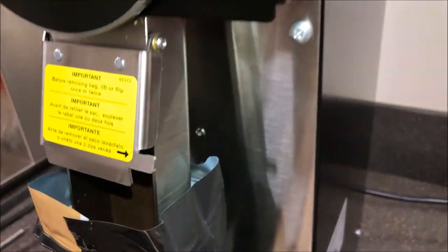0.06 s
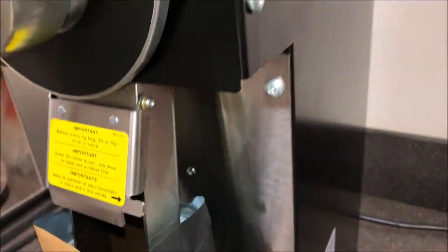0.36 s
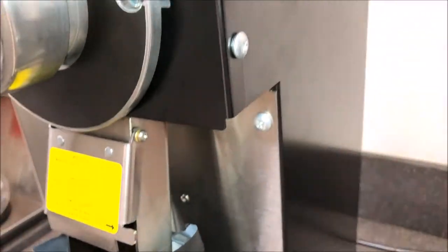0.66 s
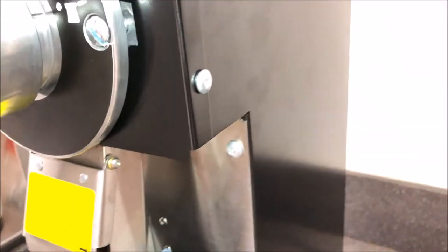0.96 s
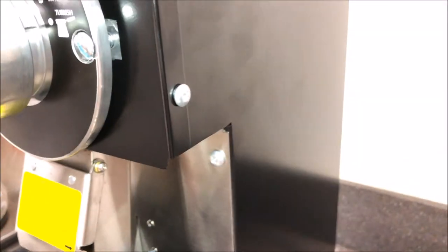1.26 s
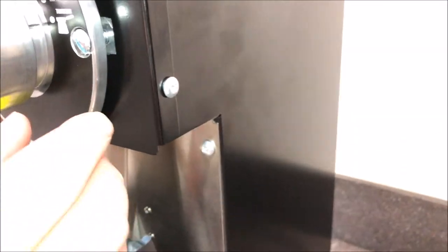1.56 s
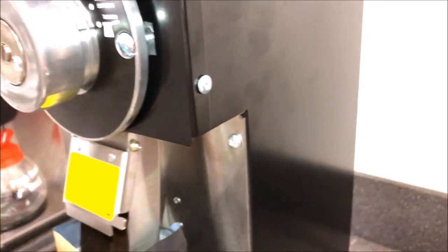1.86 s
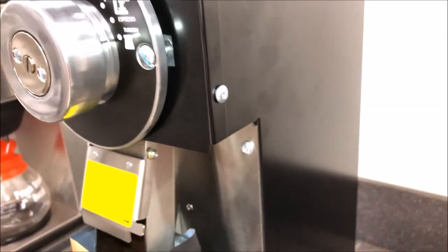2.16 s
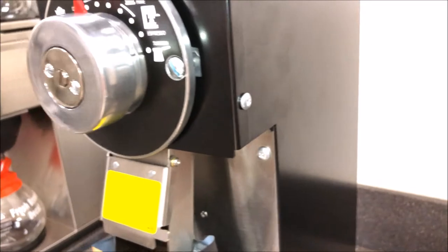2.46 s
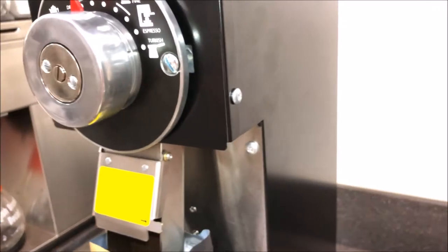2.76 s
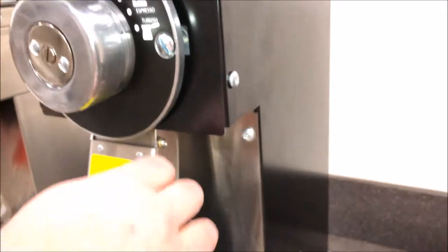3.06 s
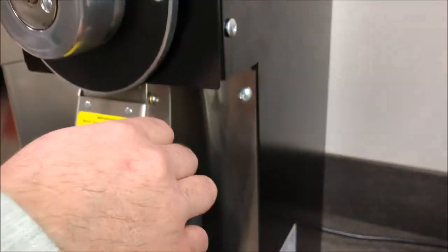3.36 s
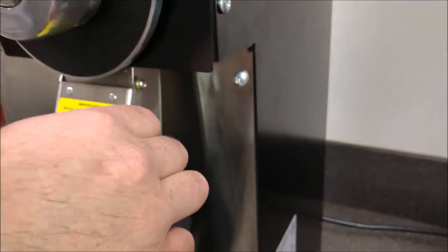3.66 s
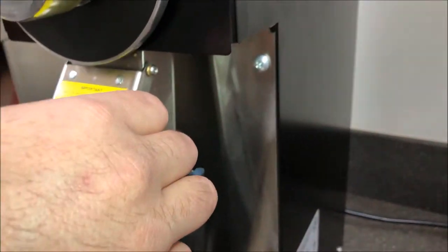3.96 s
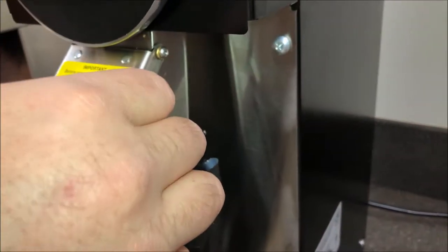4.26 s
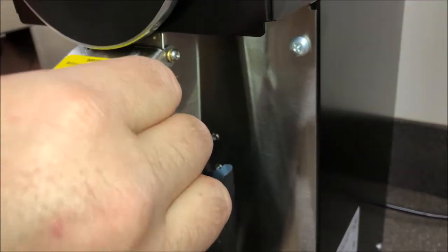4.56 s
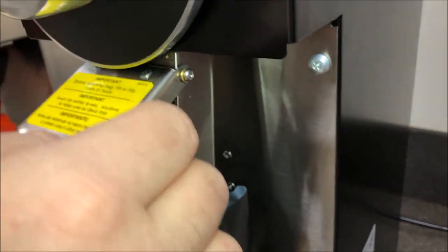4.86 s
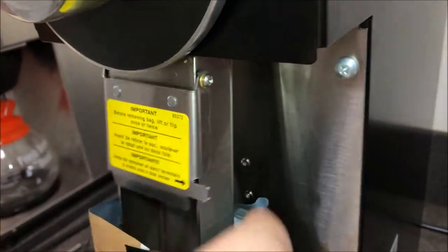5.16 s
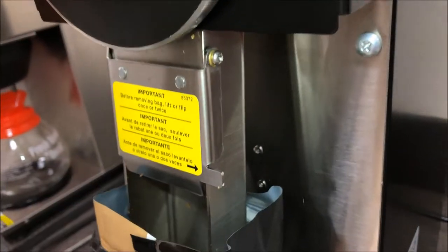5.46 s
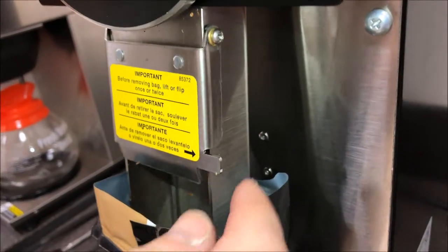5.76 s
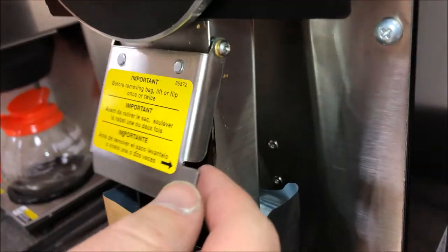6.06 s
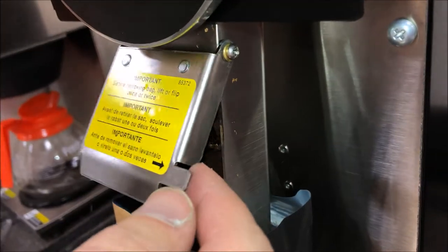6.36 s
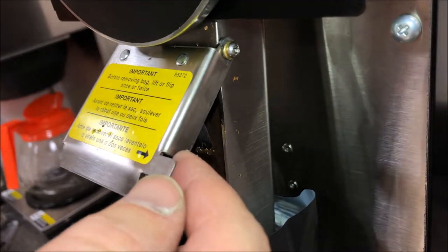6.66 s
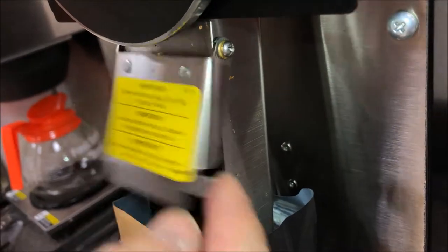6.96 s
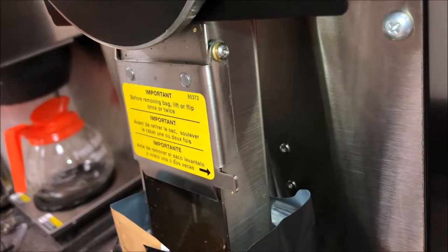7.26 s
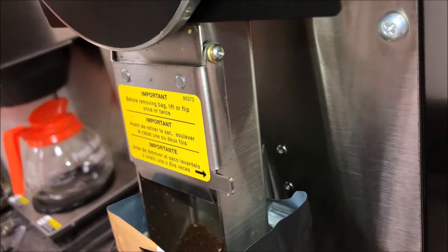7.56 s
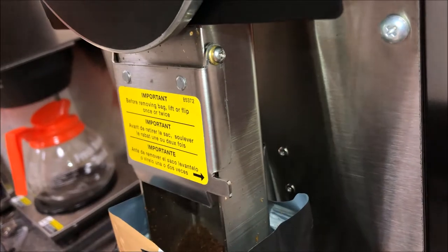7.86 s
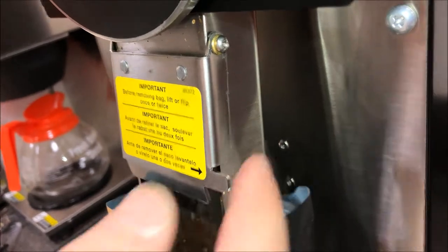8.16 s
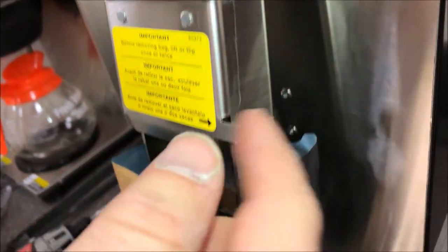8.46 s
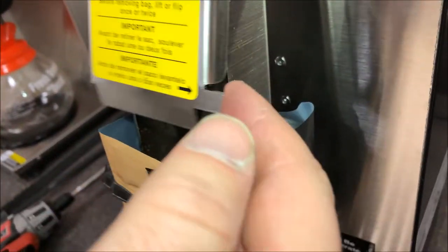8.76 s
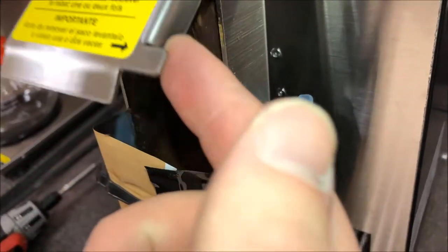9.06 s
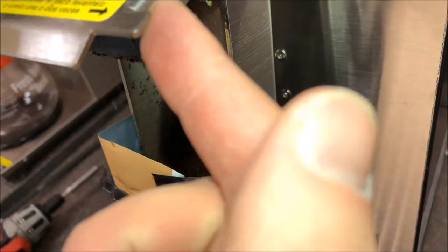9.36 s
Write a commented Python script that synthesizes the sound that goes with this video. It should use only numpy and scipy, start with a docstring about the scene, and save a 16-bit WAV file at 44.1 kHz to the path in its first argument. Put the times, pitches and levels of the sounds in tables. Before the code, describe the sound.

An electric coffee grinder is running from the very start, heard close up with tight reflections from nearby surfaces. Whole beans tumble, crack and are crushed in a dense, hissing crunch that rings the steel housing. Underneath are a steady low motor hum, some rumble and a thin, wavering whine. The crunch ducks for an instant here and there. It is slightly fainter around 2 to 4 seconds as the microphone moves, then returns with a slightly different metallic tone by 5 seconds. At about 8 seconds the beans run out and the crunch drains away, while the last ones pop one by one until roughly 8.7 seconds. The machine speeds up very slightly and its whine comes forward. From about 9 seconds to the end at 9.5, the bare burrs make a faint, rapid, squeaky scrape over the continuing hum.

```python
"""Coffee grinder running empty

Close to a moving microphone, beans tumble, crack and are crushed between steel burrs, ringing the
housing over the motor's mains hum and a thin whine. Near 8 s the hopper runs out: the crunch drains
away, the last beans pop one by one, the shaft speeds up a little and the bare burrs scrape once a turn."""
import sys
import numpy as np
from scipy import signal
from scipy.fft import rfft, irfft, next_fast_len
from scipy.io import wavfile
from scipy.ndimage import uniform_filter1d, map_coordinates

SR = 44100
rng = np.random.default_rng(int(sys.argv[2]) if len(sys.argv) > 2 else 0)


def put_to_file(sound):
    """Save the sound as 16-bit audio at rate SR, in the file named by the first command-line argument."""
    columns = np.atleast_2d(sound).T  # one column per channel
    safe = np.clip(columns, -1, 1)
    whole_steps = np.round(safe * 32767)
    wavfile.write(sys.argv[1], SR, whole_steps.astype(np.int16))


N = 420272

# shaft speed, slower under load: t/s, speed/(turns per s)
SHAFT_SPEED = [(0, 29.27), (6.6, 29.3), (7.9, 29.72), (8.9, 29.74), (9.25, 29.92), (9.53, 29.92)]
# magnetic hum of the motor: f/Hz, level/dB
MAINS_HUM = [(119.95, -20), (239.9, -57), (359.85, -55.5)]
# low beat of the breaker teeth: t/s, level/dB
TEETH_LEVEL = [(0, -26.5), (.7, -20.5), (3.4, -25), (4.5, -32), (6.1, -21.5), (6.9, -30.5), (8, -24),
               (8.95, -29), (9.2, -51)]
# tone of the frame's rumble: f/Hz, relative level/dB
RUMBLE_EQ = [(20, -28), (45, -21.5), (75, -13.5), (100, -4), (150, 0), (200, 2), (250, -8), (330, -17),
             (800, -60)]
# whine partials locked to the shaft: multiple of the turn rate, relative level/dB
WHINE_PARTIALS = [(3, -51), (18, -44), (22, -48), (33, -40.5), (43, -49.5)]
# microphone path from the side of the burr head (0) to the spout (1): t/s, spout share
MIC_PATH = [(0, 0.7), (.7, 0), (2.8, 0), (4, 0.25), (4.9, 0.84), (5.3, 0.88), (9.53, 1)]
# the crunch is fainter as the microphone backs away: t/s, level/dB
MIC_NEARNESS = [(0, 0.5), (.9, -1), (2.4, -3), (3.6, -2.5), (5.3, 0.5), (9.53, -1)]
# resonances of the steel housing: f/Hz, width/Hz, lift at the side/dB, lift at the spout/dB
HOUSING_MODES = [(374, 25, 4.5, 1.5), (549, 42, 2.5, 10.5), (666, 44, 6, 5.5), (778, 32, 9.5, 6.5),
                 (993.5, 69, 2.5, 9), (1087, 136, 6, 5), (1230, 160, 6.5, 9), (1370, 143, 9.5, 6),
                 (1776, 156, 4.5, 5.5), (2152, 133, 5, 9), (2672, 390, 2.5, 9.5), (3185, 317, 12.5, 12.5),
                 (3378, 124, 6, 7), (3708, 115, 10, 11), (4070, 72, 5.5, 1), (4537, 146, 10, 8),
                 (5280, 156, 7, 8), (5930, 150, 2.5, 5), (6225, 120, 8.5, 8), (6950, 225, 8, 15),
                 (7260, 270, 8.5, 8), (8346, 390, 12, 11), (8540, 61, 10.5, -9), (8850, 82, 2, 8.5),
                 (9440, 590, 8, 0.5), (10500, 380, 6.5, 6), (11230, 260, 4, 6.5), (12300, 180, 6, 2),
                 (13550, 610, 5.5, 7), (15430, 380, 5, 3)]
# bright hiss of crushing, midrange cracking and low tumbling, each: f/Hz, relative level/dB
CRUSH_EQ = [(2500, -44.5), (4200, -8.5), (5200, 0), (8000, 0), (12000, -1.5), (15600, 2)]
CRACK_EQ = [(700, -31), (1300, -3), (1700, 2), (3000, -0.5), (4400, -0.5), (5400, -13.5), (9000, -53.5)]
TUMBLE_EQ = [(120, -20), (220, 0), (285, 0), (430, -2.5), (900, -1), (1350, -4), (1800, -13), (4000, -40.5)]
# a hand lifts the spout flap and lets more cracking out: t/s, hold/s, lift/dB
FLAP_LIFTS = [(4.1, .7, 0.3), (6.4, 0.22, 2)]
# instants when the crunch ducks: t/s, depth/dB
CRUNCH_DIPS = [(.522, 14), (1.345, 32), (2.341, 10), (2.528, 15), (2.871, 13), (3.446, 12), (3.601, 32),
               (4.235, 9), (5.123, 32), (6.261, 13), (6.73, 15), (7.37, 12), (8.546, 13), (8.693, 13),
               (9.187, 10), (9.504, 17)]
# the strongest rings, which carry through the dips: f/Hz, width/Hz, relative level/dB
HELD_RINGS = [(1290, 55, -1), (3190, 80, 0), (3680, 40, -1), (5270, 35, -2), (6980, 90, 0), (8340, 100, -1)]
# the last beans, breaking singly: t/s, level/dB
STRAY_BEANS = [(8.012, -23), (8.045, -20), (8.092, -19.5), (8.239, -19.5), (8.3, -24.5), (8.345, -31),
               (8.427, -25), (8.491, -21.5), (8.517, -19.5), (8.578, -26), (8.672, -25)]
# ring of the burr head when a bean strikes it: f/Hz, t60/s
KNOCK_MODES = [(990, 0.14), (1290, 0.14), (1370, 0.055)]
# tone of one bean bursting: f/Hz, relative level/dB
BURST_EQ = [(250, -12), (700, 1), (1250, -13), (1800, -5), (5000, -5), (9000, -2), (15000, -31)]
# squeak of the bare burrs: f/Hz, upward glide/Hz, relative level/dB, lag/turns
SQUEAK_TONES = [(2850, 1300, 0, .015), (3300, 0, -3, .03), (4400, 350, -1, .075), (7000, 0, 0, -.01)]

RUN_OUT_S, DRAIN_DB_PER_S, CRUMBS_DB = 7.866, 22.5, -19.5  # the flow fades to a floor of crumbs


def amp(db):
    return 10 ** (np.asarray(db) / 20)


def unit_rms(x):
    return x / np.sqrt(np.mean(x ** 2) + 1e-20)


def clock():
    return np.arange(N) / SR


def eq_db(points, hz):
    """An EQ curve drawn through points on a log frequency axis."""
    f, db = np.transpose(points)
    return np.interp(np.log(hz + 1), np.log(f + 1), db)


def automation(points):
    """A (time, value) table drawn out to one value a sample."""
    return np.interp(clock(), *np.transpose(points))


def swell(start, attack, hold, release):
    """An envelope from 0 to 1 and back; times in seconds."""
    return np.interp(clock(), start + np.cumsum([0, attack, hold, release]), [0, 1, 1, 0])


def wobble(rate, oversample=8):
    """Smooth random modulation, rate knots a second."""
    knots = rng.standard_normal(int(N * rate / SR) + 4)
    steps = np.arange(len(knots) * oversample) / oversample
    return np.interp(clock() * rate / SR, steps, map_coordinates(knots, [steps], mode="mirror"))


def turn_pulse(turns, rise, fall):
    """One swell a turn; rise and fall are shares of the turn."""
    angle = turns % 1
    return unit_rms((1 - np.exp(-(angle / rise) ** 2)) * np.exp(-angle / fall))


def filtered(x, response):
    """Zero-phase filter; response gives the gain at each frequency."""
    size = next_fast_len(N + SR // 4)
    return irfft(rfft(x, size) * response(np.fft.rfftfreq(size, 1 / SR)), size)[:N]


def ringing(x, eq, modes=(), size=4096):
    """EQ plus resonant peaks, minimum phase so that the ring follows each hit."""
    hz = np.fft.rfftfreq(size, 1 / SR)
    peaks_db = sum(db / (1 + (2 * (hz - f) / width) ** 2) for f, width, db in modes)
    cepstrum = irfft(np.log(amp(eq_db(eq, hz) + peaks_db)))
    cepstrum[1:size // 2] *= 2
    cepstrum[size // 2 + 1:] = 0
    return signal.oaconvolve(x, irfft(np.exp(rfft(cepstrum))))[:N]


def shaft_turns(contact_s=9.3345):
    """Turns of the shaft, a whole number whenever the burrs come closest."""
    turns = np.cumsum(automation(SHAFT_SPEED)) / SR
    return turns - np.interp(contact_s, clock(), turns)


def hopper_flow():
    """Share of the full flow of beans: steady, then draining to crumbs."""
    drain_db = -DRAIN_DB_PER_S * np.maximum(clock() - RUN_OUT_S, 0)
    return np.hypot(amp(drain_db), amp(CRUMBS_DB))


def emptiness(at_no_flow=0.62):
    """How hollow the chamber grows as the flow fails, 0 when full."""
    return np.clip(at_no_flow * (1 - hopper_flow()), 0, 1)


def motor(turns, beats_per_turn=6):
    """The low bed: steady mains hum, the beat of the breaker teeth and the rumble of the frame."""
    hum = np.sqrt(2) * sum(amp(db) * np.sin(2 * np.pi * hz * clock()) for hz, db in MAINS_HUM)
    phase = 2 * np.pi * beats_per_turn * turns + 0.5 * wobble(12)
    octave = amp(-13.5) * automation(MIC_PATH) * np.sin(2 * phase)  # heard near the spout
    teeth = amp(automation(TEETH_LEVEL) + 2.8 * wobble(14)) * (np.sin(phase) + octave)
    rumble = unit_rms(filtered(rng.standard_normal(N), lambda hz: amp(eq_db(RUMBLE_EQ, hz))))
    rumble_db = -29.5 - 15 * emptiness() + 0.57 * wobble(9)
    return hum + teeth + amp(rumble_db) * rumble


def shaft_whine(turns):
    """Wavering partials ride on the shaft and come forward as the chamber empties."""
    whine = 0
    for multiple, db in WHINE_PARTIALS:
        level = amp(db + 0.83 * wobble(7))
        whine += level * np.sin(2 * np.pi * multiple * turns + 0.62 * wobble(12))
    return np.sqrt(2) * whine * amp(-3 + 6.7 * emptiness())


def reflections(x, t60=0.073, wet_db=-7.5, hop=16384):
    """The counter and nearby walls scatter each snap, differently as the microphone moves."""
    t = np.arange(hop // 2) / SR
    wet = np.zeros(N + 5 * hop)
    padded = np.pad(x, (hop, 2 * hop))
    for start in range(0, N + hop, hop):
        tail = rng.standard_normal(len(t)) * amp(-60 * t / t60)
        piece = padded[start:start + 2 * hop] * signal.windows.cosine(2 * hop)
        echo = signal.fftconvolve(piece, tail / np.linalg.norm(tail))
        wet[start:start + len(echo)] += echo
    return x + amp(wet_db) * wet[hop:hop + N]


def snaps(eq, full_rate_hz, spread_db, drive=1):
    """Random snaps of uneven size ring the housing, sparser and less ringing as the chamber empties."""
    empty, spout = emptiness(), automation(MIC_PATH)
    chance = np.clip(full_rate_hz / SR * amp(-7 * empty), 1e-4, 1)
    sizes = rng.standard_normal(N) * amp(spread_db * rng.standard_normal(N))
    clicks = reflections((rng.random(N) < chance) * sizes * drive / np.sqrt(chance))
    side = unit_rms(ringing(clicks, eq, [(f, width, db) for f, width, db, _ in HOUSING_MODES]))
    front = unit_rms(ringing(clicks, eq, [(f, width, db) for f, width, _, db in HOUSING_MODES]))
    direct = unit_rms(ringing(clicks, eq))  # straight down the open spout
    housing = (1 - spout) * side + spout * front
    return (1 - empty) * housing + empty * direct


def grinding_levels(flap_swing_s=0.14):
    """Faders in dB for crush, crack and tumble: all follow the flow, crush most steeply."""
    clump = swell(start=8.43, attack=0.078, hold=0.13, release=0.2)  # a late clump slips in
    loose = swell(start=7.28, attack=0.31, hold=1.26, release=0.26)  # unweighted beans bounce, fewer crack
    flow_db = 20 * np.log10(np.hypot(hopper_flow(), amp(-11) * clump))
    flap_db = sum(db * swell(s, flap_swing_s, hold, flap_swing_s) for s, hold, db in FLAP_LIFTS)
    crush_db = -14.5 + flow_db
    crack_db = -17.5 + 0.88 * flow_db - 1.8 * loose + flap_db
    tumble_db = -23.5 + 0.54 * flow_db + 2 * loose
    return automation(MIC_NEARNESS) + np.array([crush_db, crack_db, tumble_db])


def grinding(turns):
    """Beans tumble into the teeth, crack and are crushed; the last crumbs catch mostly once a turn."""
    crush_db, crack_db, tumble_db = grinding_levels()
    empty = emptiness()
    feed = amp((0.55 + 0.63 * empty) * wobble(32) + 0.55 * wobble(130) + 0.25 * wobble(10))  # lumpy
    crumbs = 0.11 + 0.5 * turn_pulse(turns, rise=0.074, fall=0.13)
    caught = feed * (1 - empty + empty * crumbs)
    crush = snaps(CRUSH_EQ, full_rate_hz=14000, spread_db=0.5, drive=caught)
    crack = snaps(CRACK_EQ, full_rate_hz=8000, spread_db=1.5, drive=caught * amp(0.5 * wobble(60)))
    tumble = snaps(TUMBLE_EQ, full_rate_hz=4500, spread_db=1.5, drive=feed * amp(0.7 * wobble(20)))
    return amp(crush_db) * crush + amp(crack_db) * crack + amp(tumble_db) * tumble


def colour_drift(x, depth_db=0.79, size=512, blur=12):
    """Beans break at ever new spots, so the colour of the crunch keeps shifting a little."""
    spectra = signal.stft(x, nperseg=size)[2]
    drift = rng.standard_normal(spectra.shape)
    drift = uniform_filter1d(uniform_filter1d(drift, blur, axis=0), blur, axis=1)
    return signal.istft(spectra * amp(depth_db * unit_rms(drift)), nperseg=size)[1][:N]


def dips(x, held_db=4):
    """The crunch ducks for an instant while its strongest rings hold on and stand out."""
    dip_db = np.zeros(N)
    for s, db in CRUNCH_DIPS:
        length_s = 0.016 + 0.00092 * db  # deeper dips last longer
        inside = np.abs(clock() - s) < length_s / 2
        dip_db[inside] += db * signal.windows.tukey(inside.sum(), 0.85)
    held = filtered(x, lambda hz: sum(amp(db) * np.exp(-((hz - f) / w) ** 2) for f, w, db in HELD_RINGS))
    duck = amp(-dip_db)
    return duck * x + (1 - duck) * amp(held_db) * held


def stray_beans(burst_db=1.5, burst_t60=0.15):
    """Each stray bean knocks the burr head and bursts in a short run of snaps."""
    bursts, knocks = np.zeros(N), np.zeros(N)
    age = np.arange(SR // 4) / SR
    attack = 1 - np.exp(-age / 0.0016)
    for s, db in STRAY_BEANS:
        span = slice(round(s * SR), round(s * SR) + len(age))
        bursts[span] += amp(db + burst_db - 60 * age / burst_t60) * attack
        for hz, t60 in KNOCK_MODES:
            level_db = db + rng.normal(0, 2.4) - 60 * age / t60
            knocks[span] += amp(level_db) * attack * np.sin(2 * np.pi * hz * age)
    return knocks + bursts * snaps(BURST_EQ, full_rate_hz=3100, spread_db=2)


def bare_burrs(turns, level_db=-39.8):
    """With no beans between them the burrs brush once a turn, with a tiny rising squeak."""
    squeak = 0
    for hz, glide_hz, db, lag in SQUEAK_TONES:
        angle = (turns - lag) % 1
        pitch = hz + glide_hz * (1 - np.exp(-angle / 0.15))  # tighter contact, higher note
        tone = np.sin(2 * np.pi * np.cumsum(pitch) / SR + 1.7 * wobble(260))
        squeak += amp(db + 1.3 * wobble(25)) * tone * turn_pulse(angle, rise=0.075, fall=0.085)
    bare = (amp(CRUMBS_DB) / hopper_flow()) ** 2  # 1 once only crumbs are left
    return amp(level_db) * bare * unit_rms(squeak)


def scene():
    """Crunch, squeak and whine dip together over the unbroken motor bed, panned centre."""
    turns = shaft_turns()
    crunch = colour_drift(grinding(turns)) + stray_beans()
    grinder = dips(crunch + bare_burrs(turns) + shaft_whine(turns)) + motor(turns)
    return np.array([grinder, grinder])


def record(dry, knee=6, top_hz=15810):
    """A soft clip rounds the highest peaks, then a brick-wall low-pass trims the top."""
    rounded = dry / (1 + np.abs(dry) ** knee) ** (1 / knee)
    return np.array([filtered(channel, lambda hz: hz < top_hz) for channel in rounded])


dry = scene()
out = record(dry)
put_to_file(out)
```